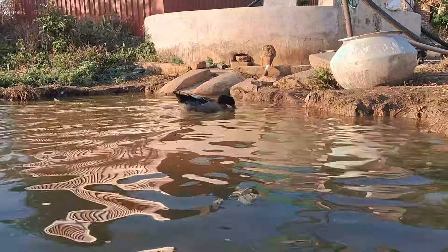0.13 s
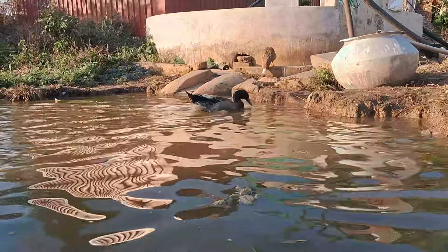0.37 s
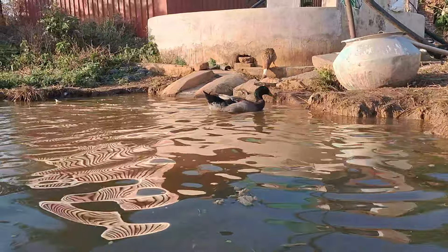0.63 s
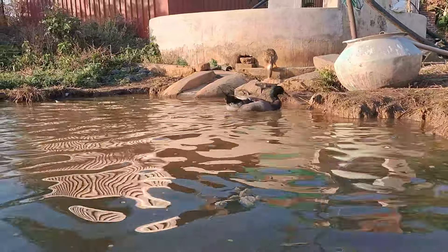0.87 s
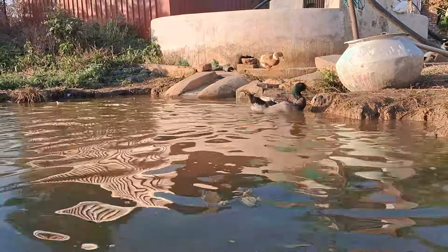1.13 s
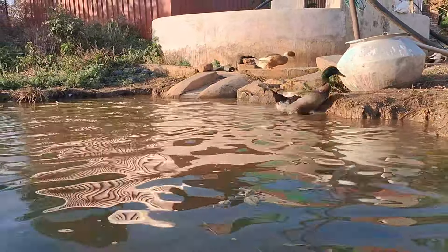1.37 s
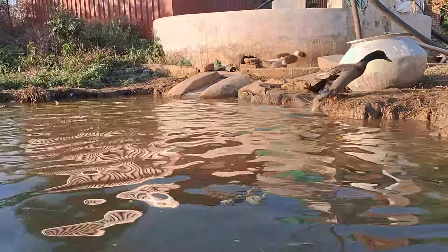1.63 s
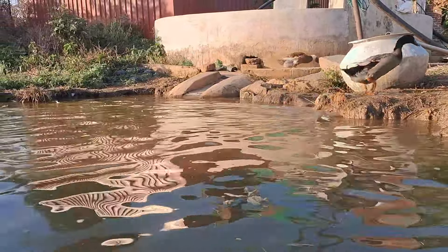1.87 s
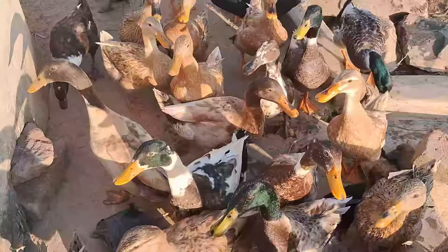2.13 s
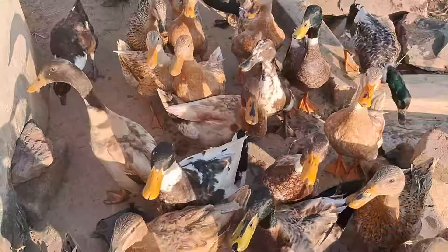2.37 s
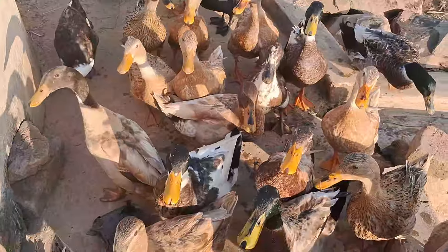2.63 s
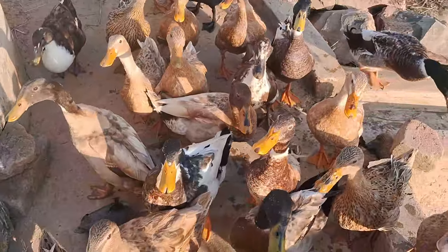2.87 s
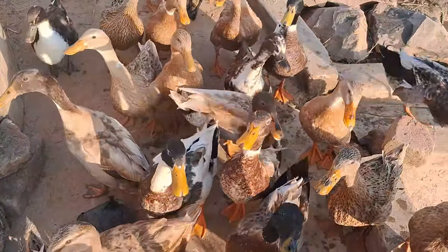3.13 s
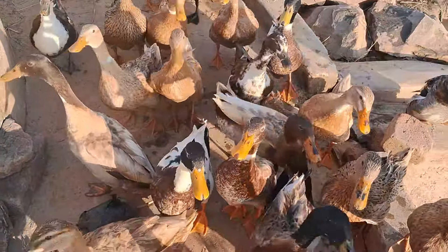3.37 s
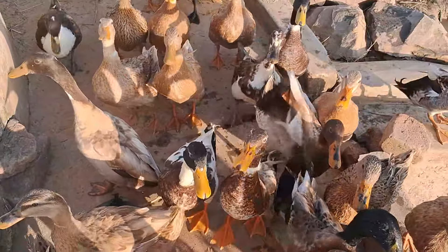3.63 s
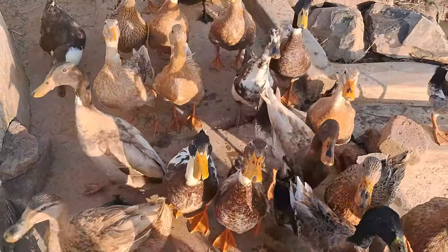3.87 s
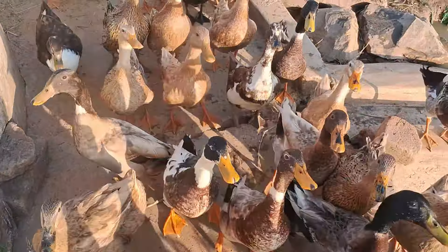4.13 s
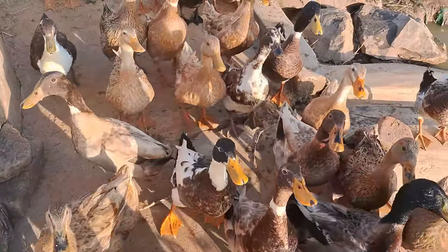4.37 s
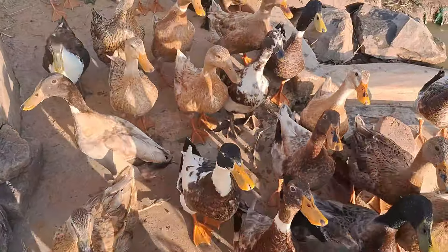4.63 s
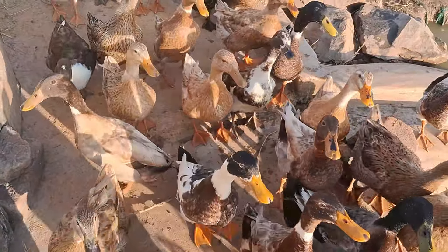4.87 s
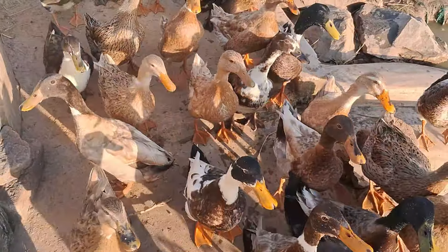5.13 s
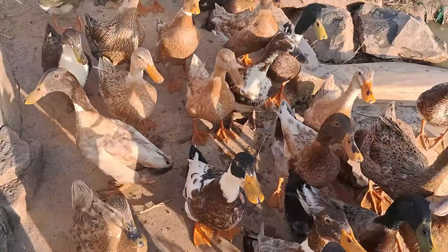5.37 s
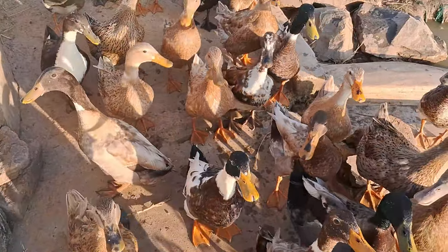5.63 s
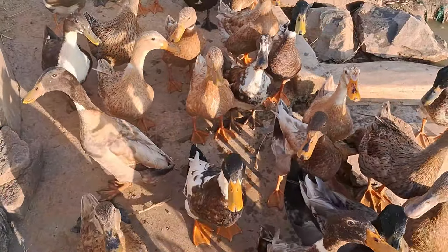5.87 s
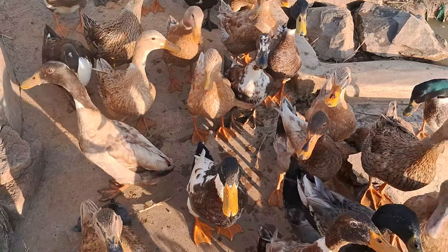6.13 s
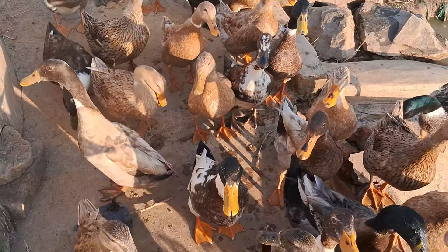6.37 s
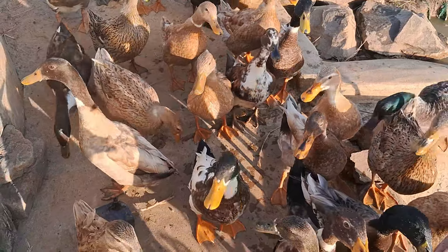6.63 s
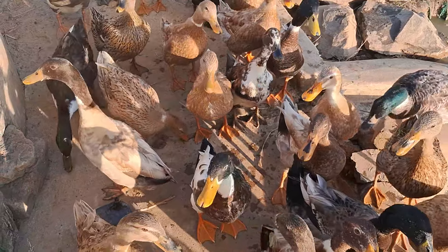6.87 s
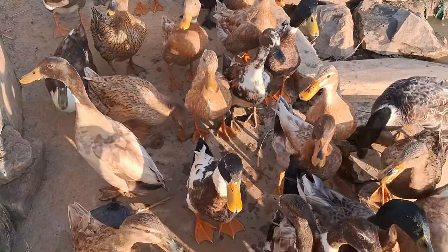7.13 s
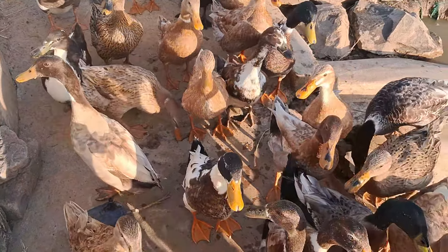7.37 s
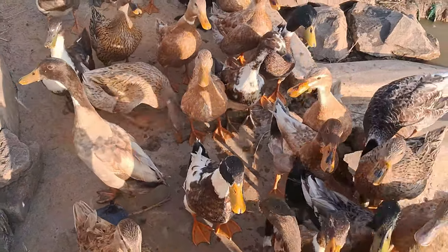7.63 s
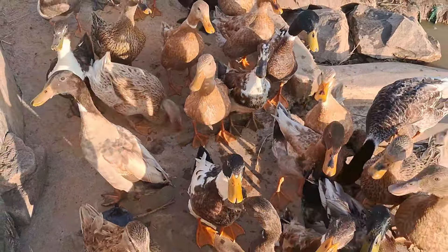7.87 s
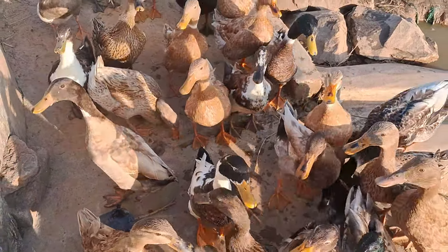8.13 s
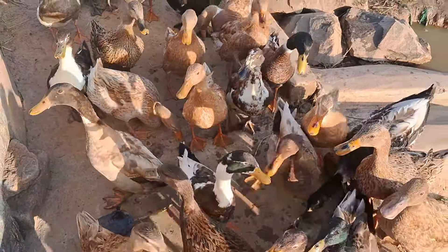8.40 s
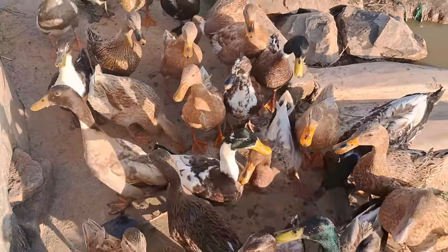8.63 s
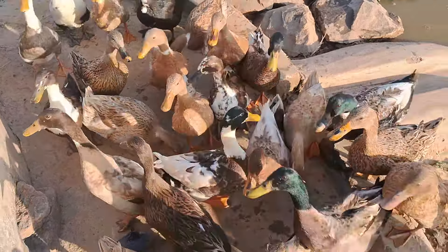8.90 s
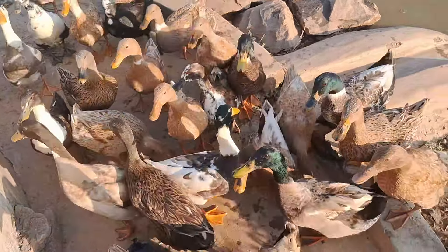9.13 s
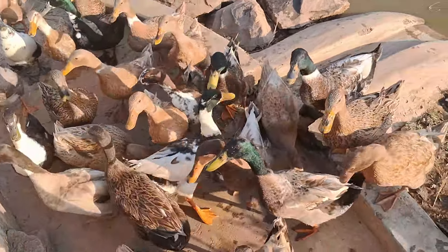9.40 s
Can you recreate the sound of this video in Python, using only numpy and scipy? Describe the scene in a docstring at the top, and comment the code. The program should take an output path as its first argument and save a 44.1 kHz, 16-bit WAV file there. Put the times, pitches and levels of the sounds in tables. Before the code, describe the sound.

Outdoors by a pond, one duck calls about seven times, evenly spaced and fairly quiet, over faint air and a thin insect buzz. Drips and a brief rush of water come as it climbs out. At two seconds an abrupt cut brings a much louder close flock: raspy quacks tumble over one another, with soft drake rasps, faint foot ticks and low wind on a handheld stereo microphone.

```python
"""Ducks, pond and bare ground

One duck calls seven times across a pond, in clean harmonics roughened by noise puffs, then climbs out
with drips; noise grains make the running water, and an insect buzzes behind in steady noise puffs.
Then a close flock on bare ground: pulse-rung hens quack over each other, breathier drakes rasp softly
and feet tick on the earth. Noise makes wind and air. The two microphone ports face apart: the right one
hears the flock duller and both places a little earlier."""
import sys
import numpy as np
from scipy import signal
from scipy.fft import rfft, irfft, next_fast_len
from scipy.io import wavfile
from scipy.ndimage import uniform_filter1d

SR = 44100
rng = np.random.default_rng(int(sys.argv[2]) if len(sys.argv) > 2 else 0)


def boost(x):
    """Linear amplitude factor 10**(x/20) for a level x in decibels (scalar or array-like)."""
    u = np.asarray(x, float) / 20
    return 10 ** u


def master_out(mix):
    """Clip the mix to full scale and print it as 16-bit PCM to the path in sys.argv[1]."""
    frames = np.transpose(np.atleast_2d(mix))
    ceiling = np.clip(frames, -1, 1)
    pcm = np.round(ceiling * 32767).astype(np.int16)
    wavfile.write(sys.argv[1], SR, pcm)


N = 419391

# hens, levels ahead of the flock gain:
# (time [s], length [s], level at peak [dB], nominal pitch [Hz], roughness [0-1, clipped])
HEN_QUACKS = [(2.103, 0.11, -18, 248, 0.84), (2.193, 0.056, -19, 161, 0.8), (2.303, 0.13, -21.5, 143.6, .8),
              (2.408, .046, -24.5, 263, 0.55), (2.489, 0.066, -24, 142.8, 0.39),
              (2.615, 0.083, -18, 176.5, .99), (2.683, .05, -21.5, 139.8, 0.65),
              (2.74, 0.089, -23.5, 136, 0.9), (2.84, 0.066, -18.5, 179, 0.75),
              (2.915, 0.12, -19, 173.7, 0.73), (3.019, 0.046, -17, 240, .8),
              (3.056, 0.062, -26, 193.8, 0.93), (3.151, 0.064, -21.5, 152.2, 0.58),
              (3.212, 0.082, -19.5, 168.5, 0.8), (3.262, .14, -16.5, 252.2, 0.8),
              (3.4, .135, -24, 259.2, 0.56), (3.53, .11, -17, 175.9, 1.05), (3.7, 0.12, -24, 160, 0.94),
              (3.804, 0.078, -20, 236.6, 1.11), (3.962, 0.091, -26.5, 260.2, 0.6),
              (4.244, 0.12, -15.5, 271.6, 0.75), (4.538, 0.11, -16.5, 281.4, .7),
              (4.63, 0.064, -26.5, 199.7, 0.9), (4.809, 0.14, -20.5, 160, .87),
              (4.952, .067, -23.5, 218.3, 0.28), (5.126, .077, -23.5, 240.9, 0.79),
              (5.263, .11, -17.5, 153.2, 0.67), (5.379, 0.059, -27, 195, 0.83),
              (5.454, 0.055, -21, 188.8, 0.63), (5.595, 0.094, -23.5, 220.6, 0.69),
              (5.707, 0.077, -22.5, 133.3, 0.65), (5.789, 0.068, -25.5, 202, 0.8),
              (5.829, 0.08, -19.5, 240, 0.2), (5.993, 0.075, -22, 186.2, 0.54),
              (6.069, 0.059, -25, 152, .7), (6.107, .072, -17, 312.8, 0.8), (6.317, 0.067, -20, 180.3, 0.8),
              (6.37, 0.078, -16, 199.2, 0.76), (6.506, 0.12, -16.5, 314.6, 0.65),
              (6.6, 0.075, -18, 188.4, 0.72), (6.676, 0.081, -18.5, 201.7, 0.85),
              (6.766, 0.087, -18, 248.7, 0.88), (6.889, .11, -21.5, 184.6, .55),
              (7.171, .1, -20, 174.3, 0.82), (7.372, 0.15, -22.5, 155.6, 0.8),
              (7.528, 0.059, -23, 228.4, 0.52), (7.609, 0.074, -23.5, 162.2, 0.78),
              (7.732, 0.053, -24, 144.4, 0.55), (7.784, 0.072, -21, 260, 0.59),
              (8.037, 0.14, -16, 267.9, 0.61), (8.348, 0.098, -24, 198.4, 0.37),
              (8.442, 0.083, -19.5, 225, 0.72), (8.524, 0.073, -19, 259, 0.64),
              (8.588, .074, -21, 197, 0.38), (8.689, 0.23, -18, 235.1, .78),
              (8.996, 0.15, -18, 243.1, 0.75), (9.18, .066, -27, 150.8, 0.7),
              (9.253, 0.081, -20, 229.7, 0.71), (9.404, 0.075, -30.5, 153.6, 0.4),
              (9.438, 0.094, -19, 211.4, 0.78)]
# drakes, breathy with little chest, levels ahead of the flock gain:
# (time [s], length [s], level at peak [dB], nominal beak resonance [Hz], nominal rasp level [dB])
DRAKE_RASPS = [(2.245, 0.055, -32.5, 1610, -23), (2.561, 0.063, -33, 2090, -15),
               (4.188, 0.076, -34, 2050, -21.5), (4.511, 0.028, -33, 2190, -24),
               (4.728, 0.072, -31, 2200, -12.5), (5.531, 0.049, -36.5, 2380, -21),
               (6.247, 0.07, -32, 2500, -9.5), (6.991, 0.025, -30, 2340, -11.5),
               (7.99, 0.06, -30.5, 2230, -20), (8.178, 0.1, -28.5, 2280, -15),
               (8.926, 0.06, -30, 2540, -9.5), (9.114, 0.063, -30, 2330, -9),
               (9.352, 0.092, -31, 2210, -21)]
# beak resonances ahead of the opening's tilt and each bird's size: (frequency [Hz], width [Hz], level [dB])
BEAK_MODES = [(1592, 455, 6), (2050, 206, 5), (2424, 374, 6), (2965, 856, 2.5)]
# chest resonances, relative to each other: (frequency [Hz], width [Hz], level [dB])
CHEST_MODES = [(240, 213, -3), (393.4, 178, -7.5), (887, 437, -6.5)]
# treble rasp resonances, relative to each other: (frequency [Hz], width [Hz], level [dB])
RASP_MODES = [(4500, 1890, 2), (5656, 1590, -4.5), (8840, 6100, -26), (13300, 1300, -31.5)]
# how wide the hens open their beaks as excitement comes and goes: (time [s], opening [0-1])
HEN_GAPE = [(2.1, 0.44), (2.5, 0.24), (2.84, 0.47), (3.03, 0.56), (3.2, 0.42), (3.28, 0.65), (3.7, 0.57),
            (4.2, 0.78), (4.8, 0.35), (4.95, 0.75), (5.9, 0.51), (6.55, .2), (6.7, 0.43), (7.3, 0.42),
            (7.55, 0.64), (8.05, 0.57), (8.4, 0.3), (9.5, 0.31)]
# feet on the earth, levels ahead of the flock gain: (time [s], peak level [dB], centre [Hz])
FOOTSTEPS = [(2.094, -31, 1200), (4.498, -42, 2650), (7.132, -46, 1660), (7.335, -43, 977),
             (7.968, -41, 2540), (8.309, -38, 463)]
# windpipe dips shared by the birds of the flock: (frequency [Hz], level [dB])
WINDPIPE_DIPS = [(95, -16), (145, -2.5), (190, -9), (240, -3), (330, -3.5), (600, 1), (750, -4.5),
                 (950, -1.5), (1150, -2.5), (1350, -1.5), (6400, 0.5), (7400, -7)]
# shading of the flock at the right port, at a share of 1: (frequency [Hz], level [dB])
RIGHT_SHADING = [(500, -0.5), (1300, 0.5), (2400, -6.5), (4400, -4), (8000, 0)]
# how far the right port faces away: (time [s], share of that shading [1])
RIGHT_FACING = [(2.1, 1.3), (3, 1.67), (4, 1.61), (8, 1.56), (9.5, 1.58)]
# calls over the pond:
# (time [s], length [s], level at peak [dB], pitch atop the arch [Hz], roughness at the peak [0-1])
DUCK_CALLS = [(0.037, 0.125, -41.5, 326.6, 0.45), (0.28, 0.14, -38.5, 330, 0.22),
              (0.552, 0.16, -37, 345.7, 0.16), (0.842, 0.18, -37, 355.4, 0.11),
              (1.158, .18, -38, 346.3, 0.29), (1.45, .235, -38, 347, 0.68), (1.759, .21, -39.5, 344, 0.5)]
# throat and beak of the pond duck: (frequency [Hz], level [dB])
DUCK_THROAT = [(150, -30), (340, -1), (700, -1), (900, -30), (1150, -34), (1400, -22), (1700, -7),
               (2100, -1), (2700, -6), (3500, -3), (4000, -26), (5900, -27), (7000, -40)]
# colour of its breath noise: (frequency [Hz], level [dB])
DUCK_BREATH = [(150, -13), (350, -6), (700, -2.5), (1100, -10), (1600, -4.5), (2300, -4.5), (3300, -14.5),
               (4100, -11), (5900, -18), (7000, -33)]
# drips: (time [s], peak level [dB])
WATER_DRIPS = [(0.0488, -45.5), (0.1476, -43), (0.184, -52), (0.2204, -52), (0.313, -40), (1.4521, -49),
               (1.4775, -49), (1.5199, -60), (1.5404, -37), (1.8342, -43)]
# water off the feathers: (time [s], level at peak [dB], rise [dB/s], fall [dB/s])
RUNNING_WATER = [(1.452, -60.5, 2500, 30), (1.54, -40, 2500, 300), (1.878, -37.5, 500, 328)]
# thin squeaks: (time [s], length [s], level [dB], centre [Hz])
THIN_SQUEAKS = [(0.243, .02, -62, 4500), (1.57, 0.064, -44.5, 5140), (7.897, .025, -73, 4200),
                (7.925, 0.014, -68, 3540)]
# gust peaks of low wind on the microphone: (time [s], level [dB])
WIND_GUSTS = [(.1, -72), (.98, -56), (1.9, -66), (2.1, -51), (2.75, -57), (4.39, -90), (6.81, -48.5),
              (9.11, -58)]
# spectrum shape of the air over the pond: (frequency [Hz], relative level per Hz [dB])
POND_AIR_SHAPE = [(59, -28), (100, -2), (169, -24.5), (217, -7), (923, -31.5), (2090, -14), (2580, -23),
                  (4640, -31.5), (7050, -29), (8170, -32), (9070, -35), (15000, -33)]
# spectrum shape of the air over the bare ground: (frequency [Hz], relative level per Hz [dB])
YARD_AIR_SHAPE = [(18, -36), (30, -12), (81, 8.5), (114, -10), (420, -9), (1680, -17), (3070, -18),
                  (3590, -24), (4540, -20), (6540, -18.5), (15500, -34.5)]
# left-right likeness of the air: (frequency [Hz], likeness [0-1])
AIR_LIKENESS = [(40, 0.88), (300, 0.63), (700, 0.4), (1400, 0.31)]

HEN_PEAK, DRAKE_PEAK, DUCK_PEAK = 0.45, 0.5, 0.55  # place of the loudest moment in a call, 0-1
SHUT_HZ, WIDE_HZ = 1596, 2200  # nominal beak resonance, shut and wide
SHUT_RASP_DB, WIDE_RASP_DB = -34, -10.5  # a wide beak lets the rasp out
FLOCK_GAIN_DB = 4.5
POND_AIR_DB, YARD_AIR_DB = -62.5, -58.5  # overall level
PLACE_CUT_S = 2.085  # from pond to bare ground


def evened(x):
    """Scales to rms 1."""
    return x / np.sqrt(np.mean(x ** 2) + 1e-20)


def read(points, hz):
    """Reads a spectrum table on a log-frequency axis."""
    f, value = np.transpose(points)
    return np.interp(np.log(hz + 1), np.log(f + 1), value)


def add(mix, s, sound):
    """Mixes a sound in at s seconds."""
    part = mix[..., round(s * SR):][..., :sound.shape[-1]]
    part += sound[..., :part.shape[-1]]


def resonate(x, hz, width):
    """A movable resonance of gain 1: a double pole around a turning carrier gives steep skirts."""
    turn = np.exp(2j * np.pi * np.cumsum(hz * np.ones(len(x))) / SR)
    r = np.exp(-np.pi * width / SR)
    return 2 * (turn * signal.lfilter([(1 - r) ** 2], [1, -2 * r, r * r], x / turn)).real


def coloured(x, points):
    """Filters by a spectrum table."""
    size = next_fast_len(x.shape[-1])
    gain = boost(read(points, np.fft.rfftfreq(size, 1 / SR)))
    return irfft(rfft(x, size) * gain, size)[..., :x.shape[-1]]


def swells(s, db, rise, fall):
    """Summed gains of peaks that rise and fall at steady dB per second."""
    s, db, rise, fall = (np.reshape(v, (-1, 1)) for v in (s, db, rise, fall))
    late = np.arange(N) / SR - s
    return boost(db + np.where(late < 0, rise, -fall) * late).sum(0)


def echoes(x, t60, first):
    """Sparse reflections of random sign after `first` seconds, other ones for each port."""
    t = np.arange(round(t60 * SR)) / SR
    signs = rng.choice([-1., 1.], (2, len(t)))
    present = rng.random((2, len(t))) < 0.05
    taps = signs * present * (t > first) * boost(-60 * t / t60)
    taps /= np.linalg.norm(taps[0])
    return signal.oaconvolve(np.atleast_2d(x), taps, axes=1)[:, :N]


def pulses(hz, jitter):
    """Marks the sample of each closing of the voice membranes; gaps vary by chance."""
    wander = evened(uniform_filter1d(rng.standard_normal(len(hz)), size=200))
    turns = np.cumsum(hz * np.clip(1 + jitter * wander, 0.3, 3)) / SR
    return np.diff(np.floor(turns + rng.random()), prepend=0) > 0


def bounces(voice):
    """A few quick reflections off ground and neighbours, other ones for each bird and port."""
    taps = np.zeros((2, 500))
    at = rng.integers(30, 500, (2, 7))
    np.put_along_axis(taps, at, rng.choice([-1., 1.], at.shape) * np.exp(-at / 250), 1)
    taps /= np.linalg.norm(taps, axis=1, keepdims=True)
    bright = coloured(voice, [(300, -20), (1000, 0)])  # bass is hardly scattered
    return boost(-9) * signal.fftconvolve(bright[None], taps, axes=1)[:, :len(voice)]


def quack(s, length, peak, peak_db, pitch_hz, rough, beak_hz, rasp_db, chest_db=-2, breath=0.1):
    """Sharp pulses ring beak, chest and rasp resonances; rough calls carry a second, unrelated voice."""
    pad = 0.011  # s of soft edge on both sides
    u = np.linspace(0, 1, round((length + 2 * pad) * SR))
    peak, rough = np.clip(peak, 0.1, 0.9), np.clip(rough, 0, 1)
    off = np.where(u < peak, 1 - u / peak, (u - peak) / (1 - peak))  # distance from the loudest moment
    shape = boost(peak_db - 13.2 * off ** 1.92) * signal.windows.tukey(len(u), 4 * pad / (length + 2 * pad))

    # pitch, beak opening and rasp follow the effort
    arch = 1.02 - 0.2 * off ** 2 + rng.uniform(-0.15, 0.1) * (u - peak)
    folds = pulses(pitch_hz * arch, 0.015 + 0.16 * rough ** 2) * 1.
    # fast voices go strong-weak
    folds *= 1 + np.clip(pitch_hz / 150 - 1.2, 0, 0.6) * rough * (-1) ** np.cumsum(folds)
    second_hz = rng.uniform(140, 280) * np.linspace(*rng.uniform(0.85, 1.15, size=2), len(u))
    folds += 0.9 * rough ** 2 * pulses(second_hz, 0.06)
    gate = signal.lfilter([1], [1, -0.98], folds)  # air puffs out after each pulse

    strength, hiss = rng.standard_normal((2, len(BEAK_MODES + RASP_MODES + CHEST_MODES), len(u)))
    uneven = folds * boost((0.7 + 4 * rough) * np.clip(strength, -3, 1.3))
    drive = iter(uneven + breath * rough * gate * hiss)  # one row for each resonance

    opening = beak_hz * (1.03 - 0.048 * off)  # a wider beak favours the higher resonances
    # each bird has its own size and glide
    bird = rng.uniform(0.96, 1.04) * (1.03 - 0.1 * off + rng.uniform(-0.06, 0.06) * (u - peak))
    beak = 0
    for k, (f, width, db) in enumerate(BEAK_MODES):
        level = boost(db + rng.normal(0, 2.35) - 26.6 * np.log2(f / opening) ** 2)
        # neighbours of opposite sign leave no gaps between them
        beak = beak + (-1) ** k * level * resonate(next(drive), f * bird, width)
    # the beak radiates no bass
    beak = signal.sosfilt(signal.butter(4, 550 + 0.32 * beak_hz, "high", fs=SR, output="sos"), beak)

    rasp = 0
    for k, (f, width, db) in enumerate(RASP_MODES):
        puffs = (0.24 + 0.049 * k) * (gate + 0.52 * k) * hiss[k]
        rasp = rasp + boost(db) * resonate(next(drive) + puffs, f, width)
    chest = sum(boost(db) * resonate(next(drive), f, width) for f, width, db in CHEST_MODES)

    rasp_gain = boost(rasp_db + 0.5 - 7.1 * off ** 0.88)
    voice = shape * evened(beak + boost(chest_db) * chest + rasp_gain * rasp)
    lag = rng.integers(1, 12)  # samples; the left port lags by the bird's bearing
    return s - pad, np.array([np.roll(voice, lag), voice]) + bounces(voice)


def ticks(events, width):
    """Short wide clicks of decaying noise, each at its own centre."""
    out, t = np.zeros(N), np.arange(400) / SR
    for s, db, hz in events:
        tick = resonate(rng.standard_normal(400) * np.exp(-t / 0.0041), hz, width)
        add(out, s, boost(db) * tick / abs(tick).max())
    return out


def flock():
    """All hens, drakes and feet, shaded at the right port, with echoes off ground and stones."""
    mix = np.zeros((2, N))
    for s, length, peak_db, pitch_hz, rough in HEN_QUACKS:
        gape = np.interp(s, *np.transpose(HEN_GAPE))
        beak_hz = SHUT_HZ + gape * (WIDE_HZ - SHUT_HZ)
        rasp_db = SHUT_RASP_DB + gape * (WIDE_RASP_DB - SHUT_RASP_DB)
        rasp_db += 0.38 * (peak_db + 20.5)  # loud calls flare in the treble
        add(mix, *quack(s, length, HEN_PEAK, peak_db, pitch_hz, rough, beak_hz, rasp_db))
    for s, length, peak_db, beak_hz, rasp_db in DRAKE_RASPS:
        add(mix, *quack(s, length, DRAKE_PEAK, peak_db, 150, 0.92, beak_hz, rasp_db, chest_db=-14, breath=0.37))
    mix += ticks(FOOTSTEPS, 3500)
    bright = coloured(mix, [(300, -5.0), (1200, 4.5)])  # the echoes carry less bass
    mix += boost(-38) * echoes(bright, 0.51, 0.0091)
    facing = np.interp(np.arange(N) / SR, *np.transpose(RIGHT_FACING))
    mix[1] += facing * (coloured(mix[1], RIGHT_SHADING) - mix[1])
    return coloured(mix, WINDPIPE_DIPS) * boost(FLOCK_GAIN_DB)


def pond_call(s, length, peak_db, top_hz, rough):
    """Clean harmonics on an arched pitch; the beak opens with the arch; noise puffs roughen both ends."""
    u = np.linspace(0, 1, round(length * SR))
    rising = u < DUCK_PEAK
    off = np.where(rising, 1 - u / DUCK_PEAK, (u - DUCK_PEAK) / (1 - DUCK_PEAK))
    wander = uniform_filter1d(rng.standard_normal(len(u)), size=300)
    hz = top_hz * (1 - 0.24 * off ** 3) * (1 + (0.05 + 0.6 * rough) * wander)
    turns = np.cumsum(hz) / SR
    rough = np.clip(rough + 0.9 * off ** 3, 0, 1)
    shut = 1 + 0.23 * off ** 2  # a closing beak lowers the upper resonances
    late = np.clip(u / 0.23, 0, 1) ** 2  # the two lowest harmonics set in after the nasal ones
    clean = 0
    for k in range(1, 20):
        level = boost(read(DUCK_THROAT, k * hz * (shut if k > 2 else 1)))
        onset = 1 if k > 2 else late * (1 - rough)
        # higher harmonics ring on later
        clean = clean + level * onset * np.cos(2 * np.pi * k * turns - 0.35 * k * k)
    puffs = (0.23 + np.exp(-(turns % 1) / 0.68)) * rng.standard_normal(len(u))  # one each cycle
    puffs = coloured(puffs, DUCK_BREATH)
    voice = np.sqrt(1 - rough ** 2) * evened(clean) + rough * evened(puffs)
    shape = boost(peak_db - np.where(rising, 13, 9) * off ** 2.65) * signal.windows.tukey(len(u), 0.16)
    return s, shape * voice


def lone_duck():
    """The pond duck and its drips, with quick reflections and an echo off wall and water."""
    duck = ticks([(s, db, 9300) for s, db in WATER_DRIPS], 7000)
    for call in DUCK_CALLS:
        add(duck, *pond_call(*call))
    far = coloured(duck, [(700, -7.0), (1300, -15), (1600, 2.5), (3000, -9), (5000, -3.0)])
    wall = echoes(far, 0.26, 0.01)
    low = coloured(duck, [(900, 0), (1200, -40)])
    left = np.roll(low, 14) + np.roll(duck - low, 6)  # bass bends further round to the left port
    return np.array([left, duck]) + boost(-14) * echoes(duck, 0.015, 0.001) + boost(-6) * wall


def splash():
    """Water running off the feathers: fine grains over a hiss."""
    drops = uniform_filter1d((rng.random((2, N)) < 0.006) * 1., size=12)
    grains = rng.standard_normal((2, N)) * (0.4 + 6 * drops)
    water = evened(coloured(grains, [(500, 7), (3000, 1), (6000, -9.0), (15000, -32)]))
    return swells(*np.transpose(RUNNING_WATER)) * water


def squeaks():
    """Brief breathy whistles: noise through a narrow resonance."""
    out = np.zeros(N)
    for s, length, db, hz in THIN_SQUEAKS:
        n = rng.standard_normal(round(length * SR))
        add(out, s, boost(db) * evened(resonate(n, hz, 500)) * np.hanning(len(n)))
    return out


def insect(hz=8300, width=900, per_s=119, level_db=-73):
    """A high buzz of decaying noise puffs at a steady rate."""
    puffs = np.exp(-(np.arange(N) * per_s / SR % 1) / 0.74)
    buzz = np.array([resonate(puffs * n, hz, width) for n in rng.standard_normal((2, N))])
    return boost(level_db) * evened(buzz)


def rumble():
    """Wind on the microphone: lumpy low noise, partly shared by the ports, a breeze with gusts."""
    n = rng.standard_normal((4, N))
    low = coloured(n[:2] + 1.5 * n[2], [(15, -30), (45, -11), (67, -1), (85, -15.5), (120, -1),
                                        (170, -25.5), (400, -84.5)])
    lumps = evened(uniform_filter1d(uniform_filter1d(n[3], size=4000), size=4000))
    breeze = boost(-70 + 7.5 * lumps)
    gusts = swells(*np.transpose(WIND_GUSTS), rise=130, fall=51)
    return (breeze + gusts) * evened(low)


def air(points, patchy_db):
    """Outdoor background: random short-time spectra with drifting patches."""
    hz = np.fft.rfftfreq(1024, 1 / SR)
    a, b, c, d, patches = rng.standard_normal((N // 256 + 5, 513, 5)).T
    patches = evened(uniform_filter1d(uniform_filter1d(patches, size=10, axis=0), size=12, axis=1))
    same = np.clip(read(AIR_LIKENESS, hz), -1, 1)[:, None]
    left = a + 1j * b
    right = same * left + np.sqrt(1 - same ** 2) * (c + 1j * d)
    z = np.array([left, right]) * boost(read(points, hz)[:, None] + patchy_db * patches)
    return evened(signal.istft(z, nperseg=1024, noverlap=768)[1][:, :N])


def scene():
    """The pond, then a 5 ms cut to the flock's ground; squeaks and wind run across both."""
    cut = np.clip((np.arange(N) / SR - PLACE_CUT_S) / 0.005, 0, 1)
    pond = lone_duck() + splash() + insect() + boost(POND_AIR_DB) * air(POND_AIR_SHAPE, patchy_db=-4.5)
    yard_air = boost(YARD_AIR_DB) * air(YARD_AIR_SHAPE, patchy_db=2.5)
    return (1 - cut) * pond + flock() + squeaks() + rumble() + cut * yard_air


def low_pass(x):
    """Removes everything above the highest recorded frequency."""
    return signal.sosfilt(signal.butter(12, 15740, fs=SR, output="sos"), x)


def record(dry):
    """The microphone's band limits and soft overload."""
    cut = signal.sosfilt(signal.butter(2, 60, "high", fs=SR, output="sos"), dry)
    held = 1.2 * np.tanh(cut / 1.2)
    edge = signal.sosfilt(signal.butter(10, 15400, "low", fs=SR, output="sos"), held)
    return low_pass(edge)


dry = scene()
out = record(dry)
master_out(out)
```